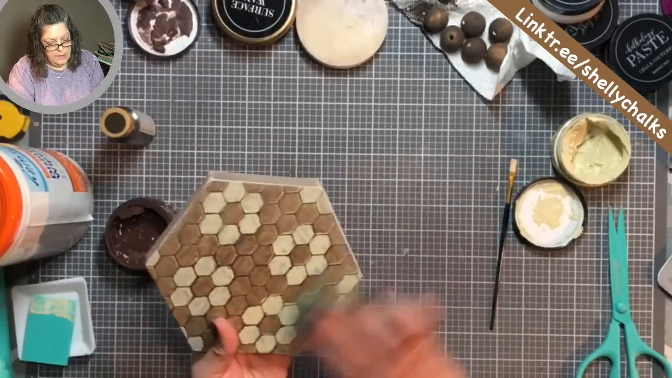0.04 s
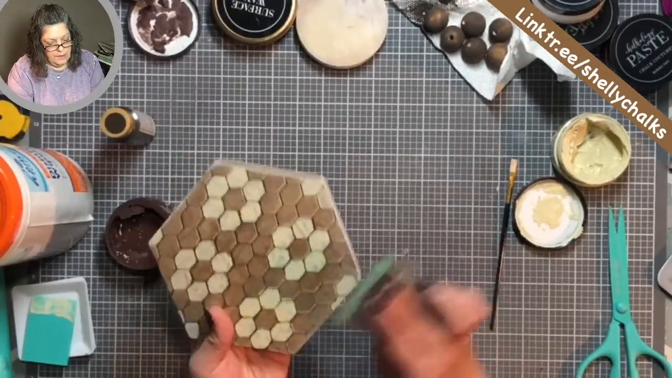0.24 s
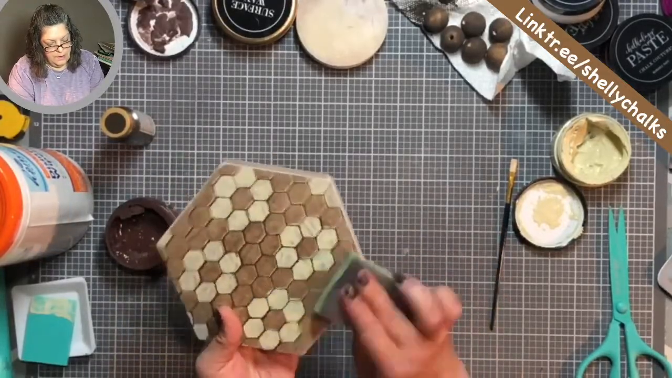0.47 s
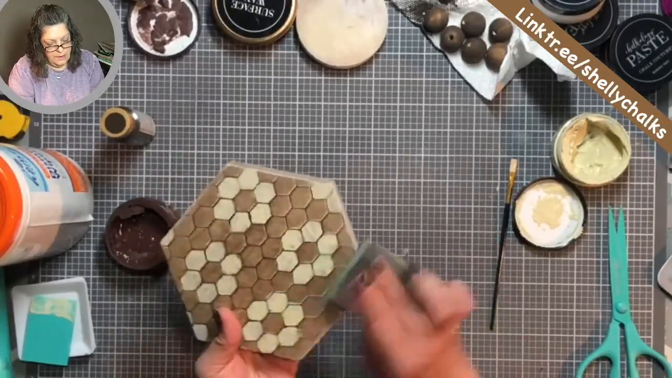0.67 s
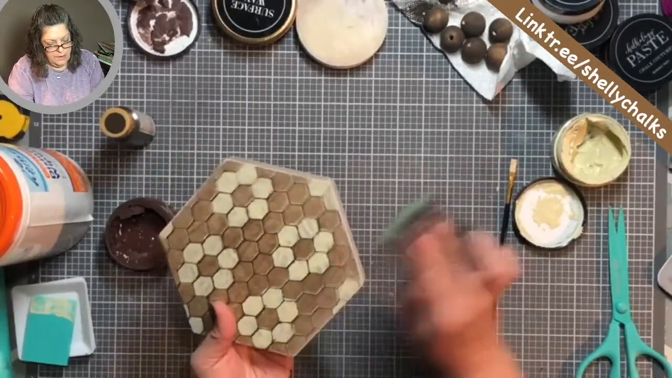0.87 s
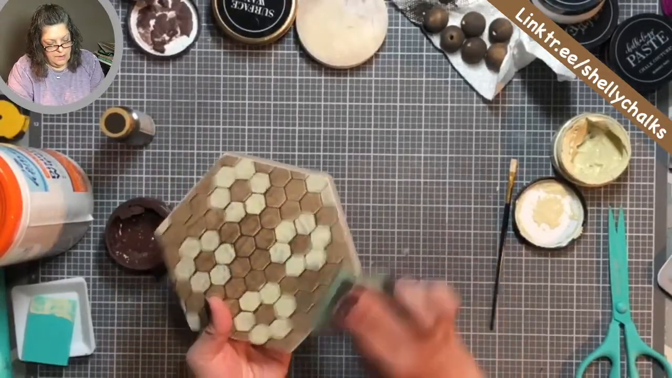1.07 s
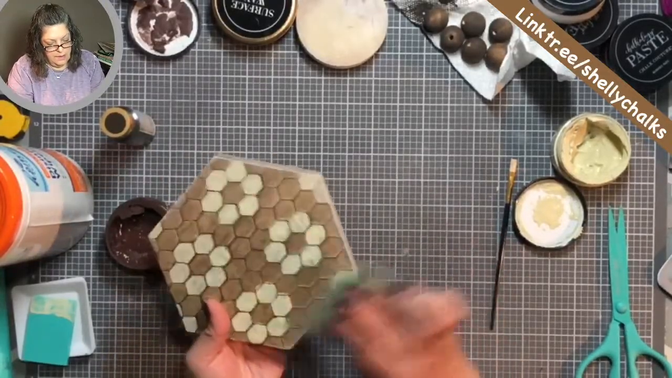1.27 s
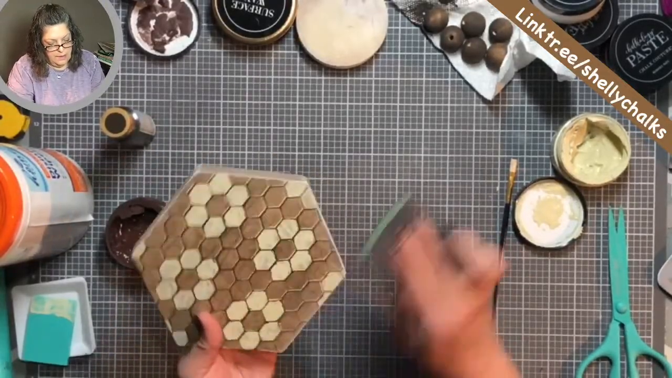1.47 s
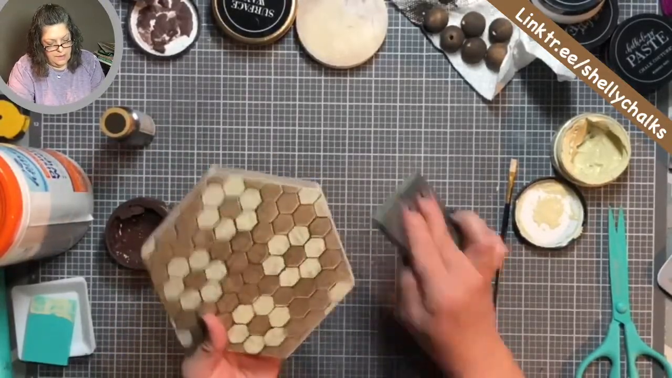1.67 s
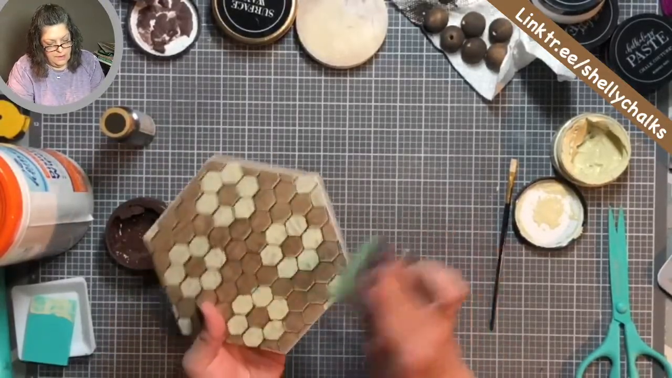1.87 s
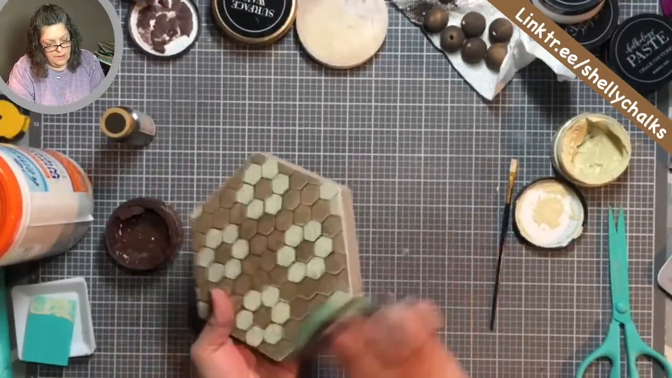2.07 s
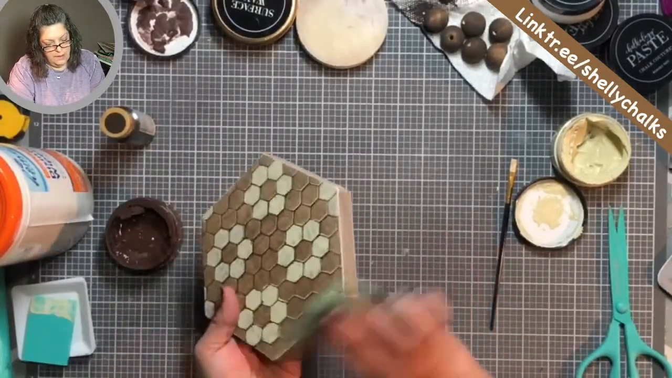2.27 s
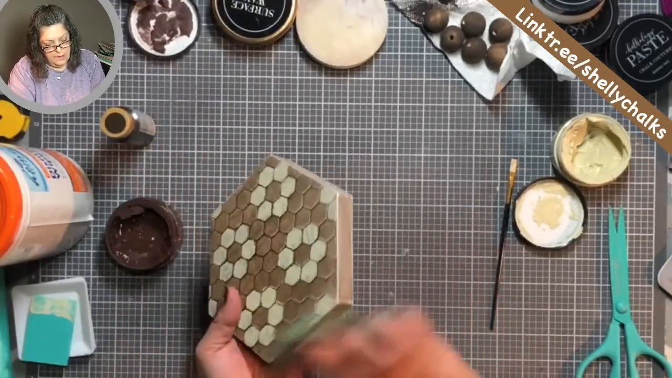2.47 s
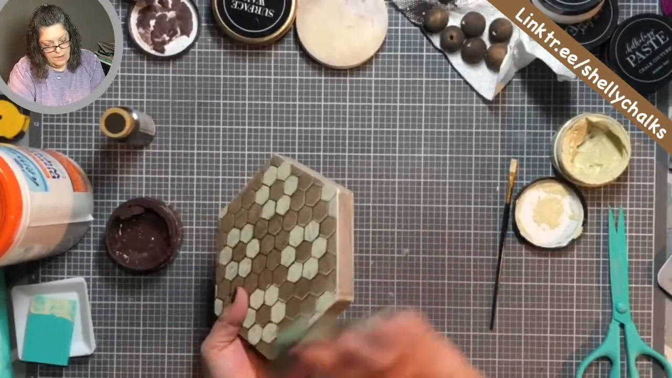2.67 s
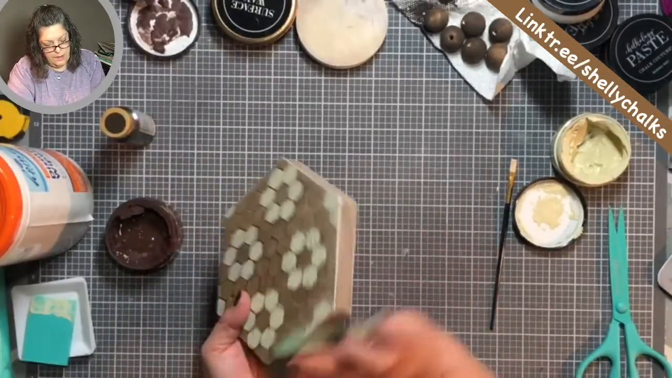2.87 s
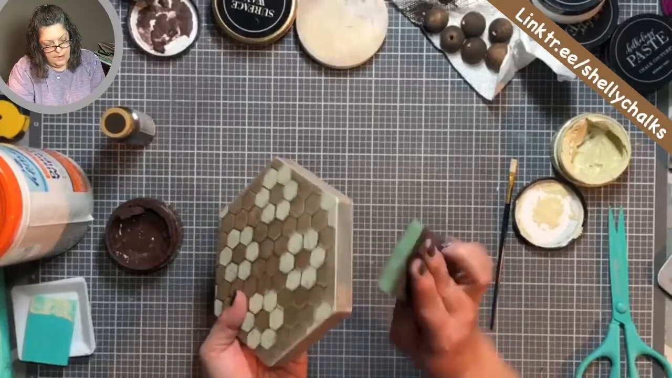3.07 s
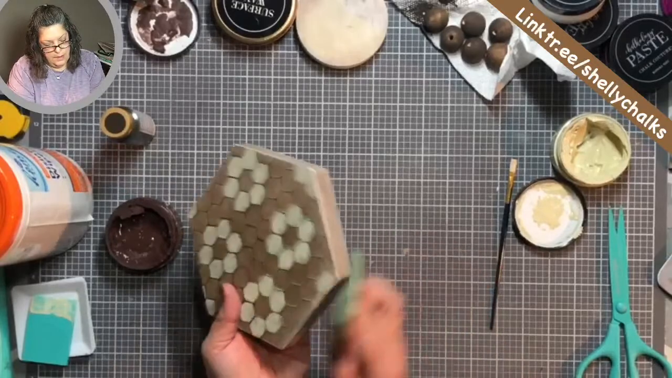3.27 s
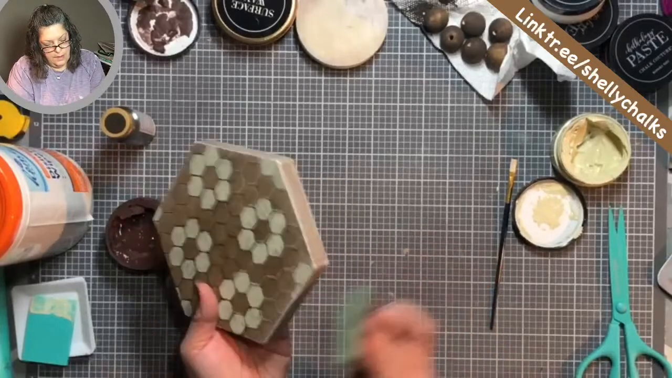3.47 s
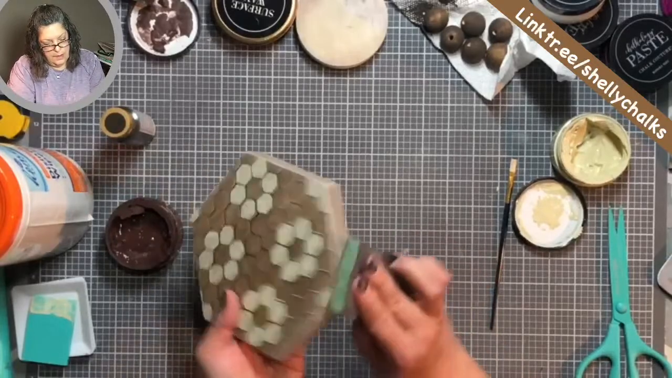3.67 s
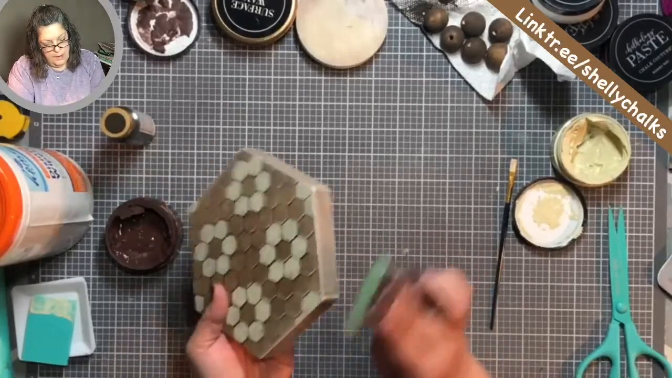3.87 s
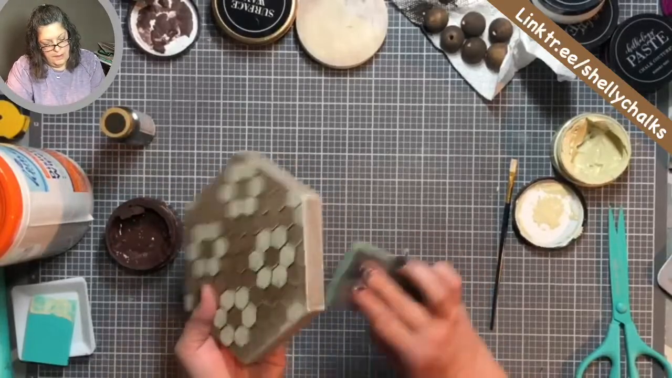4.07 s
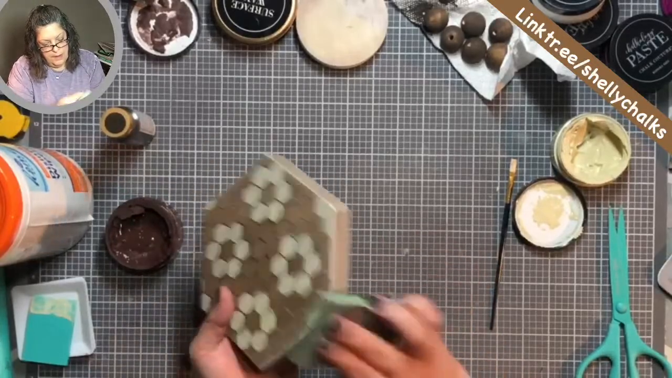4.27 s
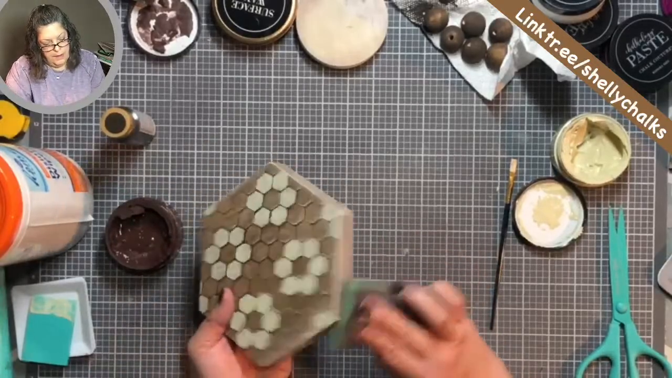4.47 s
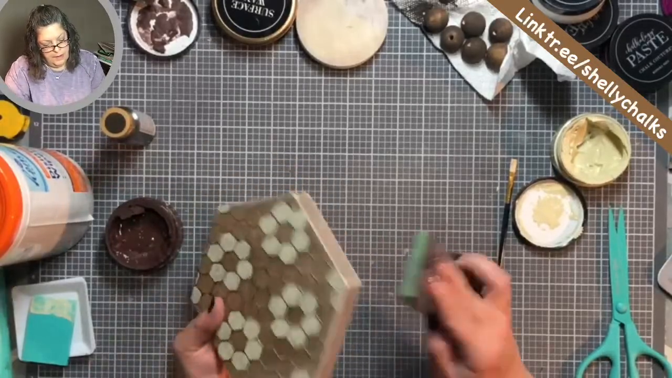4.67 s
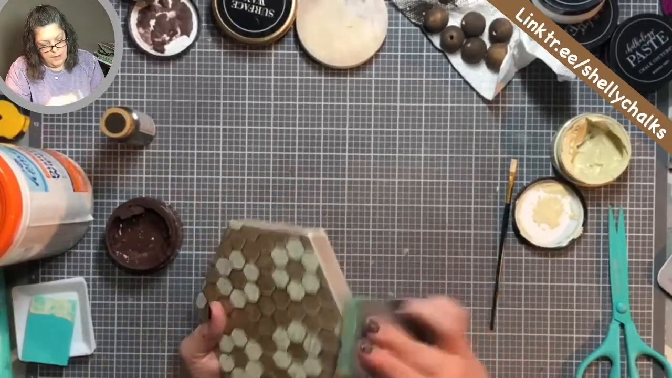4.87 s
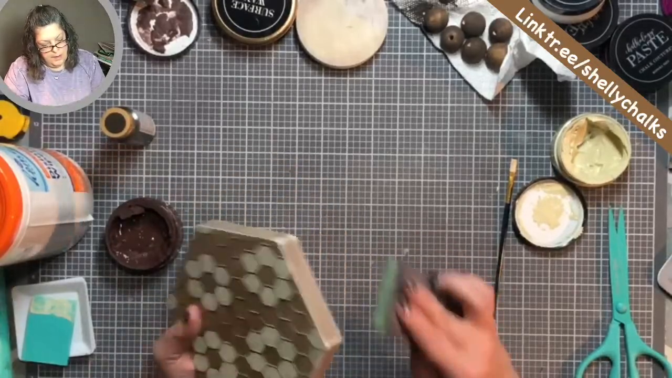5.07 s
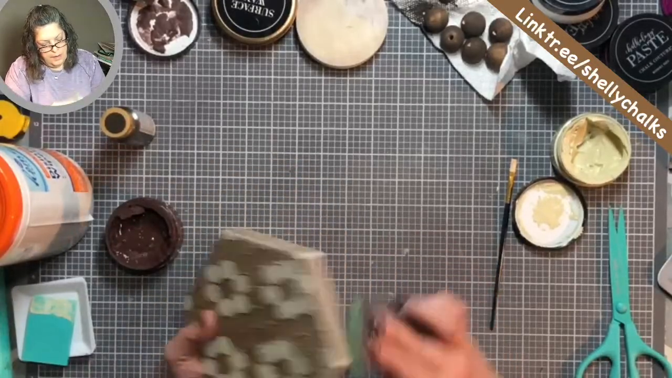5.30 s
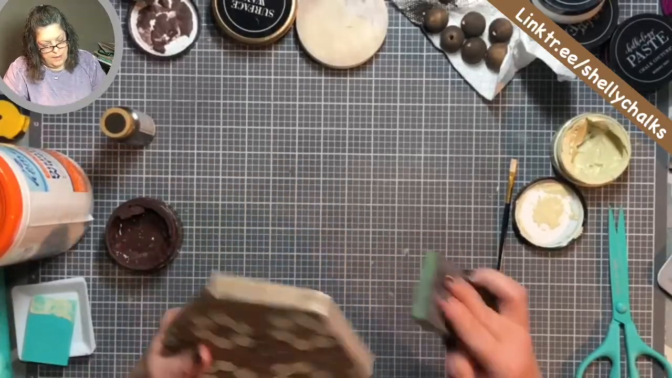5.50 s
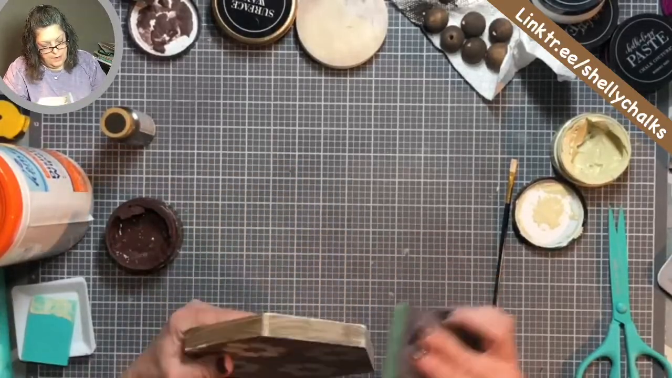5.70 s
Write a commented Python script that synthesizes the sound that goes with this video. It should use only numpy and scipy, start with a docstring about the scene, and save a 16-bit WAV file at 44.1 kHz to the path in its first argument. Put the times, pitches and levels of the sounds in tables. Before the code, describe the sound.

Dry, gritty sanding on a small wooden board, fast scrubbing bursts giving way to isolated scrapes, soft knocks and faint handling rustle.

```python
"""A foam sanding block scrapes the painted edges of a hexagonal wooden plaque held in one hand, heard up close.
Quick back-and-forth runs alternate with looser swipes; taps mark most of the touchdowns.
Random clumps of grain impulses, coloured by the hold and swelled by speed and pressure, make the scrape.
Short grain bursts make taps and snags; narrow noise makes edge chirps and corner thuds.
Handling rustles in between, and a small room with a low, wavering hum answers."""
import sys
import numpy as np
from scipy import signal
from scipy.fft import rfft, irfft, next_fast_len
from scipy.io import wavfile
from scipy.ndimage import uniform_filter1d, map_coordinates

SR = 44100
rng = np.random.default_rng(int(sys.argv[2]) if len(sys.argv) > 2 else 0)


def int16_out(signal):
    """Quantize to a 16-bit WAV file."""
    q = np.round(np.clip(np.atleast_2d(signal).T, -1, 1) * 32767)
    wavfile.write(sys.argv[1], SR, q.astype(np.int16))


N = 253134
TIME = np.arange(N) / SR  # seconds

# strokes of the block, levels before trim and judder:
# (start [s], length [s], grit level [dB], wood level [dB], fastest point [share of the stroke])
STROKES = [(-.009, 0.11, -18, -32.5, 0.46), (0.102, 0.12, -14, -33.5, 0.32), (.388, 0.093, -19, -35, .34),
           (0.481, 0.099, -16.5, -35, 0.38), (0.575, 0.096, -18.5, -33.5, 0.49),
           (0.678, 0.095, -16, -36, 0.27), (.762, 0.1, -16.5, -31, 0.53), (0.87, 0.11, -15.5, -34.5, .22),
           (1.158, 0.087, -25.5, -30.5, 0.7), (1.428, 0.1, -18.5, -35, 0.32),
           (1.665, 0.084, -19.5, -32.5, 0.42), (1.975, 0.13, -28, -38, 0.41),
           (2.112, 0.1, -19.5, -42.5, 0.65), (2.215, 0.1, -19.5, -36.5, 0.28),
           (2.314, 0.1, -17, -35.5, .36), (2.415, 0.11, -18.5, -31, .43), (2.531, 0.1, -20.5, -33, 0.32),
           (2.628, 0.12, -21.5, -35.5, .45), (2.744, .103, -20.5, -34, .3), (2.842, 0.092, -21, -32, 0.52),
           (2.942, 0.13, -21.5, -34.5, 0.42), (3.323, 0.075, -32, -30, 0.47), (3.364, 0.15, -32, -35, 0.32),
           (3.744, 0.091, -21.5, -28, 0.35), (4.055, 0.11, -22, -30, 0.51), (4.392, 0.2, -33, -35, 0.43),
           (4.534, 0.078, -28, -33, 0.51), (5.006, 0.085, -22, -31.5, 0.5),
           (5.335, 0.097, -20.5, -27.5, 0.62)]
WOOD_TRIM_DB, FIZZ_TRIM_DB = -1.2, 2.5
PRESSURE_LAG = 0.031  # share of a stroke by which pressure peaks after speed

# colour of the scrape in each hold on the board: (frequency [Hz], relative density [dB per Hz])
CORNER = [(100, -39), (200, -31), (400, -24), (700, -19), (1100, -19.5), (2000, -18), (3000, -15),
          (4200, -15), (6200, -7.5), (9500, -10.5), (12000, -6), (15500, -0.5)]
SIDE_EDGE = [(100, -41.5), (200, -27.5), (400, -13.5), (700, -10), (1100, -12), (2000, -11), (3000, -14),
             (4200, -14), (6200, -11), (9500, -8.5), (12000, -7.5), (15500, -1)]
LOWER_EDGE = [(100, -47.5), (200, -38.5), (400, -30), (700, -26.5), (1100, -26.5), (2000, -18), (3000, -15),
              (4200, -6.5), (6200, -1), (9500, -8.5), (12000, -6.5), (15500, -8)]
FLAT = [(100, -15), (200, -14.5), (400, -7), (700, -6.5), (1100, -11.5), (2000, -2.5), (3000, -11),
        (4200, -4), (6200, -4), (9500, -8.5), (12000, -12), (15500, -7.5)]
TILTED = [(100, -29), (200, -17), (400, -10.5), (700, -12.5), (1100, -6.5), (2000, -8.5), (3000, -10),
          (4200, -2), (6200, -4), (9500, -2), (12000, 0), (15500, 3)]
# resonances on top of each colour: (frequency [Hz], width [Hz], lift [dB])
CORNER_MODES = [(1345, 54, 5.5), (2280, 140, -2), (5320, 470, 7), (7340, 1350, 4), (13470, 920, 2)]
SIDE_MODES = [(835, 110, 2.2), (1393, 120, 5.1), (1820, 300, 5.6), (2420, 410, 0.585), (5520, 770, 8),
              (13540, 800, 2.43)]
LOWER_MODES = [(1376, 236, 4.9), (2174, 140, 6), (3700, 1400, 4), (4660, 220, 3.3)]
FLAT_MODES = [(840, 150, 5.5), (1453, 59, 7.7), (1990, 360, 2.1), (4100, 360, 3.1)]
TILTED_MODES = [(1455, 94, 3.7), (1916, 240, 9.2), (2410, 270, 3.5), (4080, 400, 4.1), (6050, 530, 6.2),
                (7900, 390, 2)]
# ways of holding the block: (colour, resonances, rasp over grit [dB], stroke pointedness [exponent])
GRIPS = [(CORNER, CORNER_MODES, -4.5, 0.97), (SIDE_EDGE, SIDE_MODES, -2.5, 1.2),
         (LOWER_EDGE, LOWER_MODES, -.9, 0.99), (FLAT, FLAT_MODES, 1.3, 1),
         (TILTED, TILTED_MODES, -0.28, 1.44)]
# changes of hold: (time [s], hold [row of GRIPS])
HOLDS = [(0, 0), (1.1, 1), (2.11, 0), (2.215, 2), (3.2, 3), (3.6, 4), (4.3, 3), (4.8, 4)]
# wood, rasp and fizz, in that order: (low edge [Hz], high edge [Hz])
BANDS = [(150, 2500), (2500, 9000), (9000, 20000)]

# fingers and block shift on the wood, levels before unevenness: (middle [s], length [s], level [dB])
RUSTLES = [(1.027, 0.17, -53.5), (1.308, .1, -61), (3.252, 0.36, -51.5), (3.526, 0.15, -48),
           (3.614, .11, -46.5), (3.94, .06, -48.5), (4.283, 0.22, -58.5), (5.19, 0.054, -54),
           (5.574, .1, -57.5), (5.73, 0.043, -58)]
RESTING_DB = -73.5  # constant faint touch of fingers on the board, before unevenness

# colour of the room background: (frequency [Hz], relative density [dB per Hz])
FLOOR = [(21, -36.5), (43, -33.5), (60, -11.5), (75, -1), (110, 0.5), (190, -7), (290, -7.5), (450, -18),
         (920, -33.5), (2050, -29.5), (3050, -38.5), (3850, -24.5), (5100, -35.5), (10000, -35.5),
         (16000, -38)]
# hum tones, levels before wavering: (frequency [Hz], level [dB])
HUM = [(74.5, -62), (97, -85.5)]
# decay of the walls: (frequency [Hz], time to fall 60 dB [s])
ROOM_T60 = [(330, 0.53), (860, 0.46), (2050, 0.3), (4150, 0.34), (8050, 0.3), (15050, 0.22)]
# how strongly the walls answer: (frequency [Hz], gain [dB])
ROOM_SEND = [(330, -18), (860, -21), (2100, -11.5), (3050, -8), (4150, -11), (5650, -16.5), (9050, -12.5),
             (15050, -15.5)]

# the block bumps over a corner, levels before attack: (time [s], level [dB], pitch [Hz])
BUMPS = [(0.173, -33.5, 553), (1.204, -34, 841), (1.992, -35, 485), (3.359, -24, 604), (3.372, -32, 749),
         (3.452, -31.5, 641), (4.134, -30.5, 426)]
# the block touches down, levels before attack: (time [s], level [dB], length [s])
TOUCHES = [(1.15, -28, 0.0086), (1.418, -20.5, 0.0079), (1.647, -41, 0.023), (1.98, -38, 0.022),
           (3.311, -40, 0.023), (3.709, -26, 0.0078), (4.04, -30.5, 0.0098), (4.383, -35.5, .014),
           (4.971, -35, 0.012), (5.303, -30.5, 0.016)]
# the grit snags and snaps free, levels before attack: (time [s], level [dB])
SNAGS = [(1.499, -16.5), (3.322, -19), (3.811, -19), (4.434, -15)]
SNAG_S = 0.0022
TICKS_PER_S, TICK_DB, TICK_S = 1.1, -50, 0.005  # stray ticks of handling: rate, level before attack, length
# colour of the taps: (frequency [Hz], relative density [dB per Hz])
TAP_COLOUR = [(110, -37.5), (220, -8.5), (420, -12), (750, -12), (2050, -15), (3100, -5.5), (4250, -5),
              (6100, -6.5), (9400, -9), (12100, -6), (15400, 0.5)]
KNOCK_DB = -9.5  # the board's knock relative to the crunch
# the edge chatters under the grit: (middle [s], level [dB], pitch [Hz])
CHATTER = [(2.36, -23, 6050), (2.481, -17, 6300), (2.566, -18, 6020), (2.7, -22.5, 6640),
           (2.772, -19.5, 6450), (2.905, -20.5, 6640), (2.983, -19, 6410)]
CHATTER_S = 0.039
TOP_HZ = 15800  # band limit


def amp(db):
    """Decibels to gain."""
    return 10 ** (np.asarray(db) / 20)


def unit(x):
    """x at rms 1."""
    return x / np.sqrt(np.mean(x ** 2) + 1e-20)


def along(points, hz):
    """(frequency, value) points read on a log frequency axis."""
    f, v = np.transpose(points)
    return np.interp(np.log(hz + 1), np.log(f + 1), v)


def wobble(rate):
    """A smooth random curve, rate knots a second."""
    knots = rng.standard_normal(int(N * rate / SR) + 4)
    return map_coordinates(knots, [TIME * rate])


def swell(start, peak, end):
    """A smooth rise from 0 to 1 and back."""
    return np.sin(np.pi * np.interp(TIME, [start, peak, end], [0, 0.5, 1])) ** 2


def filtered(x, gain):
    """x through a causal, minimum-phase filter whose gain is a function of frequency."""
    m = 2 * next_fast_len(N // 2 + 8192)
    log_gain = np.log(np.maximum(gain(np.fft.rfftfreq(m, 1 / SR)), 1e-6))
    cepstrum = irfft(log_gain)
    # folding the cepstrum onto positive time makes the filter causal
    cepstrum[1:m // 2] *= 2
    cepstrum[m // 2 + 1:] = 0
    return irfft(rfft(x, m) * np.exp(rfft(cepstrum)), m)[:N]


def lift(modes, hz):
    """Gain of a set of resonance peaks."""
    return amp(sum(db / (1 + (2 * (hz - centre) / width) ** 2) for centre, width, db in modes))


def share(hz, low, high):
    """Gain of one band; bands that meet at an edge add up smoothly."""
    def below(edge):
        return 1 / (1 + (hz / edge) ** 8)
    return below(high) - below(low)


def split(x, bands):
    """x divided into bands, each at rms 1."""
    spectrum, hz = rfft(x), np.fft.rfftfreq(N, 1 / SR)
    return np.array([unit(irfft(spectrum * share(hz, low, high), N)) for low, high in bands])


def narrow(pitch_hz, width_hz):
    """A rough tone: a narrow band of noise around the pitch, at rms 1."""
    turn = 2 * np.pi * pitch_hz * TIME
    return unit(wobble(width_hz) * np.sin(turn) + wobble(width_hz) * np.cos(turn))


def grit(rate, size_db, clump_db):
    """Abrasive grains catch and snap free: tiny impulses of uneven size that come in clumps."""
    catches = rng.random(N) < rate / SR
    spread = np.minimum(rng.exponential(size=N), 4)
    sizes = amp(size_db * spread) * rng.uniform(-1, 1, N)
    clumps = amp(clump_db * wobble(450))
    return unit(catches * sizes * clumps)


def sanding():
    """Speed drives the fizz of the grit, pressure drives the wood, and the rasp between needs both."""
    hold = np.zeros(N, int)
    for since, row in HOLDS:
        hold[TIME >= since] = row
    pointed = np.array([grip[-1] for grip in GRIPS])[hold]

    drive = np.zeros((3, N))  # wood, rasp, fizz
    for start, length, grit_db, wood_db, fastest in STROKES:
        end = start + length
        heaviest = fastest + PRESSURE_LAG
        speed = swell(start, start + fastest * length, end) ** pointed
        pressure = swell(start, start + heaviest * length, end) ** pointed
        drive[0] += amp(wood_db + WOOD_TRIM_DB) * pressure ** 0.42
        drive[1] += amp(grit_db) * (speed * pressure) ** 0.3
        drive[2] += amp(grit_db + FIZZ_TRIM_DB) * speed ** 0.82

    # the block judders as it drags, which the board feels most
    judder = wobble(130)
    drive *= amp([1.96 * judder + 1.12 * wobble(45), 1.0 * judder, 0.88 * judder])

    grains = grit(rate=25000, size_db=1.57, clump_db=1.06)
    out = np.zeros(N)
    for row, (colour, modes, rasp_db, _) in enumerate(GRIPS):
        scrape = filtered(grains, lambda hz: amp(along(colour, hz)) * lift(modes, hz))
        wood, rasp, fizz = drive * split(scrape, BANDS)
        out += (hold == row) * (wood + amp(rasp_db) * rasp + fizz)
    return out


def roam(x, patchy_db=1.35):
    """As the contact travels along the edge, each resonance is driven now harder, now softer."""
    z = signal.stft(x, nperseg=512)[2]
    field = uniform_filter1d(rng.standard_normal(z.shape), size=4, axis=0)  # over frequency
    field = uniform_filter1d(field, size=8, axis=1)  # over time
    return signal.istft(z * amp(patchy_db * unit(field)), nperseg=512)[1][:N]


def shifting(uneven_db=3.5):
    """Skin and foam catching on the wood give a faint, uneven rustle."""
    moving = sum(amp(db) * swell(s - length / 2, s, s + length / 2) for s, length, db in RUSTLES)
    grains = grit(rate=14000, size_db=1.5, clump_db=7)
    rustle = filtered(grains, lambda hz: amp(along(FLAT, hz)))
    return (moving + amp(RESTING_DB)) * amp(uneven_db * wobble(46)) * unit(rustle)


def background(floor_db=-54.0):
    """Coloured noise makes the low room rumble; sines wavering in level and phase make the hum."""
    air = unit(filtered(rng.standard_normal(N), lambda hz: amp(along(FLOOR, hz))))
    hum = np.zeros(N)
    for hz, db in HUM:
        tone = unit(np.sin(2 * np.pi * hz * TIME + 0.7 * wobble(6.7)))
        hum += amp(db + 1.5 * wobble(3.3)) * tone
    return amp(floor_db) * air + hum


def reverberate(x, t60, delay):
    """x scattered into a noise tail of unit energy; each frequency dies at its own speed."""
    hz, t, z = signal.stft(rng.standard_normal(SR // 2), SR, nperseg=256)
    tail = signal.istft(z * amp(-60 * t / t60(hz)[:, None]), SR, nperseg=256)[1]
    tail = np.pad(tail / np.linalg.norm(tail), (round(delay * SR), 0))
    return signal.fftconvolve(x, tail)[:N]


def room(x, clutter_db=-12, clutter_t60=0.13):
    """Jars and tools nearby scatter the sound first, then the walls answer."""
    clutter = reverberate(x, lambda hz: np.full_like(hz, clutter_t60), delay=0.002)
    walls = reverberate(x, lambda hz: along(ROOM_T60, hz), delay=0.006)
    return amp(clutter_db) * clutter + filtered(walls, lambda hz: amp(along(ROOM_SEND, hz)))


def bumps(t60=0.1, width_hz=400, attack=0.0015):
    """The hand damps the board, so a bump is a short, dull thud."""
    out = np.zeros(N)
    for s, db, pitch_hz in BUMPS:
        age = np.maximum(TIME - s, 0)
        out += amp(db - 60 * age / t60) * (1 - np.exp(-age / attack)) * narrow(pitch_hz, width_hz)
    return out


def taps(attack=0.0013):
    """Touching down or snagging, the soft block briefly crunches grains and knocks the board."""
    snags = [(s, db, SNAG_S) for s, db in SNAGS]
    tick_times = TIME[rng.random(N) < TICKS_PER_S / SR]
    ticks = [(s, TICK_DB, TICK_S) for s in tick_times]
    drive = np.zeros(N)
    for s, db, length in [*TOUCHES, *snags, *ticks]:
        age = np.maximum(TIME - s, 0)
        drive += amp(db) * np.exp(-(age / length) ** 2) * (1 - np.exp(-age / attack))
    grains = grit(rate=27000, size_db=0.6, clump_db=-1.0)
    coloured = filtered(grains, lambda hz: amp(along(TAP_COLOUR, hz)) * lift(TILTED_MODES, hz))
    knock, crunch = split(coloured, [BANDS[0], (BANDS[1][0], TOP_HZ)])
    return drive * (amp(KNOCK_DB) * knock + crunch)


def chatter(width_hz=650):
    """Stick and slip on the edge gives short, rough chirps of narrow noise."""
    out = np.zeros(N)
    for s, db, pitch_hz in CHATTER:
        shape = np.sqrt(swell(s - CHATTER_S / 2, s, s + CHATTER_S / 2))
        out += amp(db) * shape * narrow(pitch_hz, width_hz)
    return out


def scene():
    """The work and its room, the same in both channels."""
    work = roam(sanding()) + shifting() + bumps() + taps() + chatter()
    mono = work + room(work) + background()
    return np.array([mono, mono])


def record(dry):
    """The treble fades to nothing across 200 Hz around the band limit."""
    m = next_fast_len(N + 8192)
    keep = np.clip((TOP_HZ - np.fft.rfftfreq(m, 1 / SR)) / 200 + 0.5, 0, 1)
    return irfft(rfft(dry, m) * keep, m)[:, :N]


dry = scene()
out = record(dry)
int16_out(out)
```